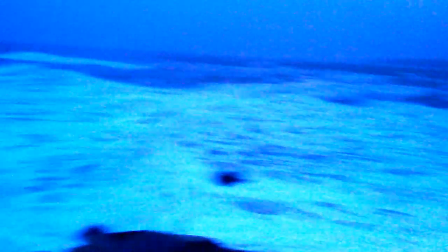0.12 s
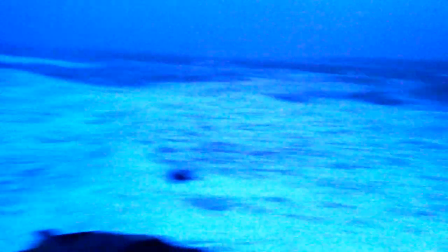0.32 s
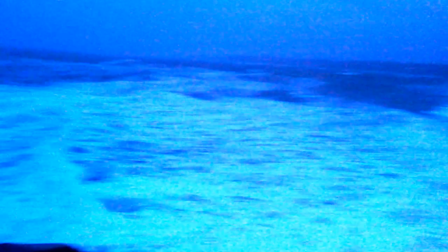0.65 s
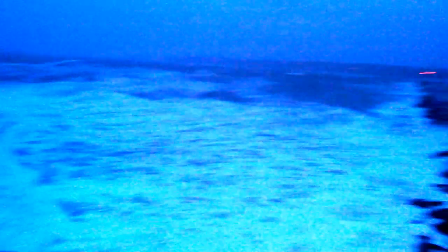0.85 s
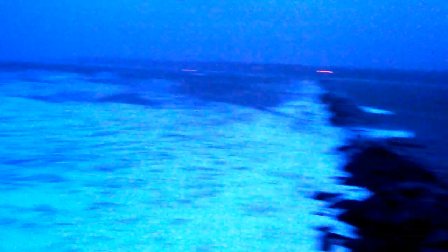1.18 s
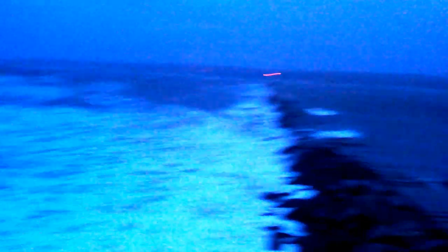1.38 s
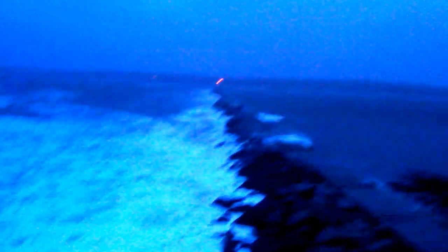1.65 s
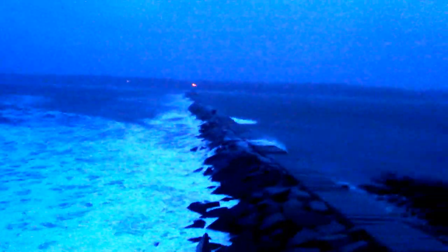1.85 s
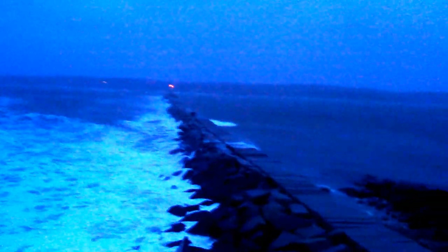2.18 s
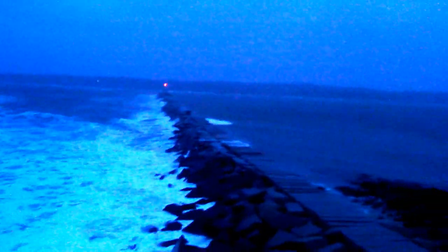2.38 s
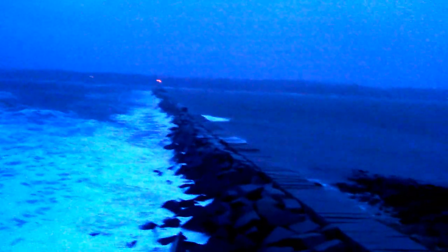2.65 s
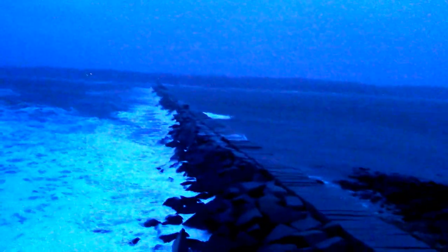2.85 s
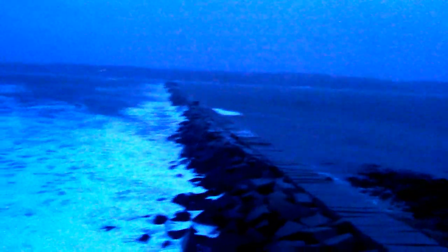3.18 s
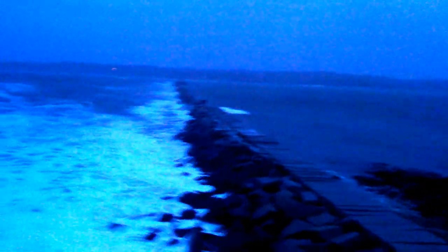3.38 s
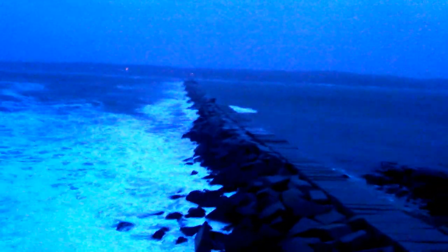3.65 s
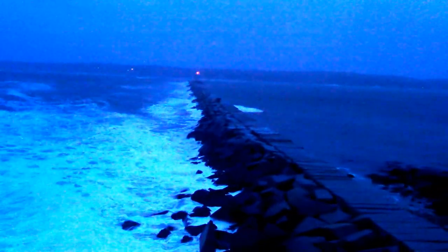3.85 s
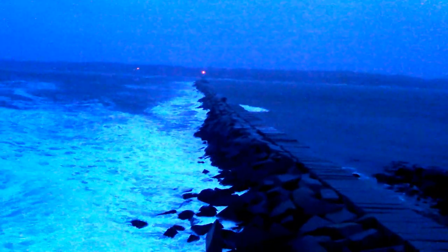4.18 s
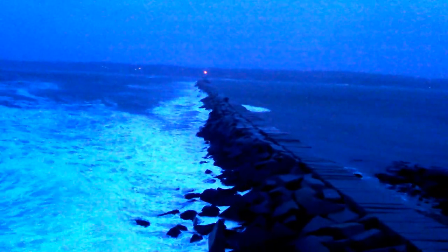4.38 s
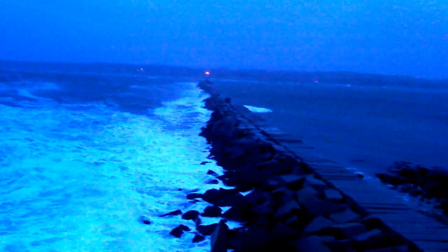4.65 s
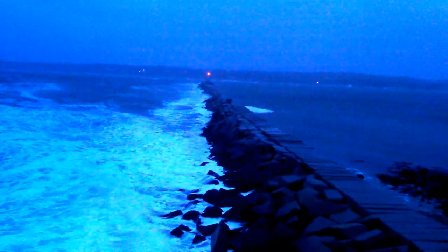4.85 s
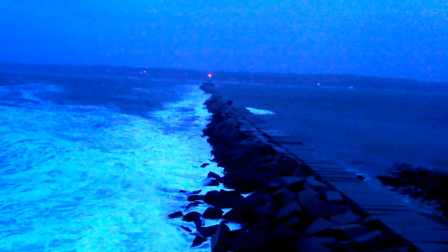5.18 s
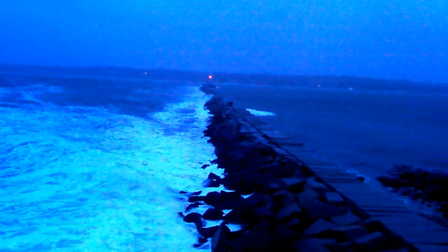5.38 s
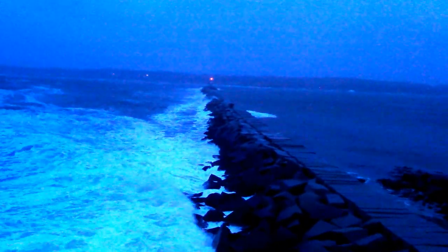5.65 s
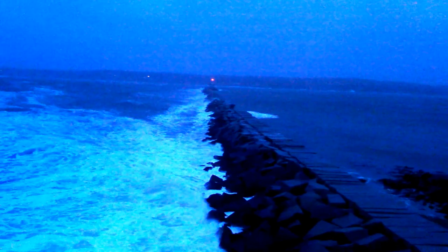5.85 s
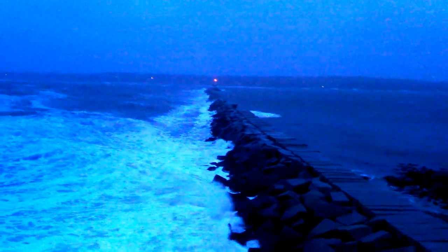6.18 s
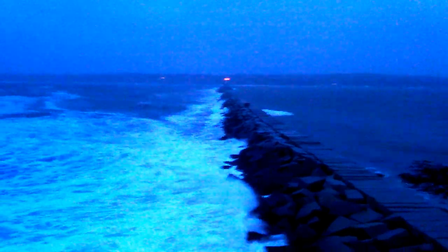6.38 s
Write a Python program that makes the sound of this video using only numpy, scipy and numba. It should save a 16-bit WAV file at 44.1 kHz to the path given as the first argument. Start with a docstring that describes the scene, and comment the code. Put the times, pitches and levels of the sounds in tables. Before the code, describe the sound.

Storm surf roars continuously over breakwater rocks while hard wind gusts thump and rasp on the microphone, easing after about three seconds.

```python
"""Storm surf washes over the rocks of a breakwater while gusts buffet a hand-held camera.
The surf is a broad, churning roar: shaped noise whose patches of foam flare up and die.
The wind is noise that rumbles and rasps in buffets on two microphone ports, with pops on single ports;
a thin sine whistle comes from the electronics. The camera cross-feeds the ports to widen all but the
whistle, and its gain control ducks the whole sound when it gets loud, then slowly lets it back up."""
import sys
import numpy as np
from scipy import signal
from scipy.fft import rfft, irfft
from scipy.io import wavfile
from scipy.ndimage import uniform_filter1d
from numba import njit

SR = 44100
rng = np.random.default_rng(int(sys.argv[2]) if len(sys.argv) > 2 else 0)


def generate_wav(signal):
    """Clip the signal to [-1, 1] and save it as 16-bit WAV at the path in sys.argv[1]."""
    frames = np.transpose(np.atleast_2d(signal))
    scaled = np.clip(frames, -1, 1) * 32767
    pcm = np.round(scaled).astype(np.int16)
    wavfile.write(sys.argv[1], SR, pcm)


N = 287091
T = np.arange(N) / SR  # time in s

# Slow heave of the sea, ahead of the gain control: time_s [s], level_db [dB]
SURF_HEAVE = [(0, -23.5), (0.6, -22.5), (1.3, -21.5), (1.7, -23), (2.2, -21.5), (2.7, -21.5), (3.25, -21),
              (3.7, -25.5), (4.02, -22.5), (4.4, -22), (5.15, -23.5), (5.55, -23), (6, -23.5), (6.51, -21)]
# Relative spectrum of breaking water at one port: frequency_hz [Hz], density_db [dB per Hz]
SURF_SPECTRUM = [(20, -40), (45, -5), (70, 6.5), (130, -2.5), (200, -6.5), (320, -5.5), (450, -9),
                 (700, -16.5), (1000, -19.5), (1500, -25), (2600, -29), (3300, -32), (4700, -33),
                 (6200, -37), (8000, -36.5), (10300, -39), (12300, -45.5), (14000, -41.5)]
# Correlation of the ports, high for long waves: frequency_hz [Hz], likeness [-1 to 1]
SURF_LIKENESS = [(100, 0.99), (300, 0.87), (450, 0.78), (700, 0.53), (1100, 0.084), (14000, 0.031)]


def surf(patchy_db=1.0, churn_db=0.41):
    """Incoherent sum of countless bubbles: noise modulated in time and frequency by patches of foam."""
    roar = ports(SURF_SPECTRUM, SURF_LIKENESS, lean_db=-1.5, lag_ms=0.072)
    hz, frame_s, cells = signal.stft(roar, SR, nperseg=512, noverlap=384)
    patches = rng.standard_normal((len(frame_s), len(hz)))
    patches = uniform_filter1d(patches, size=24, axis=0)  # each patch lasts several frames
    patches = uniform_filter1d(patches, size=7, axis=1)  # and spans several bands
    patches = evened(patches).T
    churn = wander(frame_s, 2.8, 18)
    cells = cells * amp(patchy_db * patches + churn_db * churn)
    foam = signal.istft(cells, SR, nperseg=512, noverlap=384)[1][:, :N]
    level_db, = curves(SURF_HEAVE, T)
    return amp(level_db) * evened(foam)


# Steady push of the wind, hard at first, then a lull, then freshening: time_s [s], rumble_db [dB]
WIND_PUSH = [(0, -13), (0.22, -13), (0.46, -6.5), (0.61, -13.5), (0.8, -10.5), (1.05, -13.5), (1.2, -11.5),
             (1.35, -16.5), (1.55, -3), (1.63, -9.5), (1.95, -9.5), (2.3, -4), (2.58, -14), (2.8, -15.5),
             (3.05, -20.5), (3.62, -14.5), (3.85, -32), (4.25, -22), (4.62, -25.5), (4.85, -15.5),
             (5.02, -18), (5.15, -17), (5.32, -22.5), (5.45, -21), (5.72, -12.5), (6.15, -17),
             (6.51, -13.5)]
# Big eddies that hit the ports: centre_s [s], rumble_db [dB], rasp_db [dB], half_length_s [s]
BUFFETS = [(0.012, -5, -30, 0.014), (0.083, -6, -28, 0.011), (0.134, -4.5, -19, 0.01),
           (0.161, -5, -14.5, 0.011), (0.256, -0.5, -13, 0.0074), (0.28, -4, -12, 0.011),
           (0.308, -8.5, -8.5, 0.012), (0.377, 1, -25, 0.011), (0.4, -2, -30, 0.011),
           (0.427, -3.5, -8, 0.009), (0.464, -2.5, -13, 0.0054), (0.488, 0.5, -12, 0.0088),
           (0.535, -5, -11, 0.013), (0.744, -2, -26, 0.013), (0.778, -0.5, -26, 0.0087),
           (0.874, -4.5, -17.5, 0.014), (1.108, -14, -20, 0.012), (1.195, -12, -17, 0.009),
           (1.238, -14, -26.5, 0.011), (1.282, -6.5, -27, 0.014), (1.42, -2, -8, 0.016),
           (1.462, 2.5, -2, 0.015), (1.505, 6, 3, 0.015), (1.536, -4, -7.5, 0.0083),
           (1.567, -0.5, -14, 0.02), (1.679, -1, -1.5, 0.0052), (1.749, -4, -12, 0.0082),
           (1.863, -1.5, -24, 0.0079), (2.032, 2.5, -1.5, 0.01), (2.052, 1, -6.5, 0.01),
           (2.156, 1, -6, 0.0081), (2.174, -1, -5, 0.0053), (2.246, -4, -10, 0.0073),
           (2.288, 6.5, -2, 0.0096), (2.422, -5, -12.5, 0.019), (2.506, -7, -7, 0.0099),
           (2.682, -7, -12, 0.021), (3.32, -5, -32, 0.015), (3.469, -3.5, -14, 0.011),
           (3.572, -16, -14, 0.016), (3.608, -4.5, -14, 0.0056), (3.631, -9, -22, 0.018),
           (4.166, -7.5, -25, 0.009), (4.203, -10.5, -24, 0.011), (4.293, -17, -18, 0.012),
           (4.469, -8.5, -28, 0.024), (4.707, -10, -17.5, 0.018), (4.768, -10.5, -38, 0.031),
           (4.813, -10, -26, 0.012), (4.88, -11, -42, 0.0062), (4.91, -6, -19, 0.0033),
           (4.964, -6, -25, 0.014), (5.502, -10, -17, 0.011), (5.638, -6.5, -17, 0.022),
           (5.832, -9, -26, 0.0082), (5.863, -8.5, -8, 0.0096), (6.031, -16, -37.5, 0.018),
           (6.327, -12, -23, 0.015), (6.47, -13, -17, 0.0077), (6.5, -10, -21, 0.012)]
# Relative spectrum of the large eddies: frequency_hz [Hz], density_db [dB per Hz]
RUMBLE_SPECTRUM = [(15, -50), (30, -22), (45, -7.5), (65, 3.5), (100, 2), (150, -4), (220, -8),
                   (290, -15.5), (450, -44), (900, -98)]
# Negative where an eddy pushes one port and sucks the other: frequency_hz [Hz], likeness [-1 to 1]
RUMBLE_LIKENESS = [(60, -0.37), (300, -0.25)]
# Relative spectrum of the small eddies: frequency_hz [Hz], density_db [dB per Hz]
RASP_SPECTRUM = [(20, -45), (60, -21), (120, 3.5), (220, -2), (320, 3.5), (500, -8.5), (750, -23),
                 (1100, -30.5), (1700, -40), (4000, -52), (12000, -79)]


def wind(rasp_db=-11.5):
    """Turbulent pressure: large eddies rumble, small ones rasp as the large pressure swings furthest."""
    push_db, = curves(WIND_PUSH, T)
    push = amp(push_db)
    rumble_power = push ** 2
    rasp_power = (push * amp(rasp_db)) ** 2  # rasp_db is relative to the steady rumble
    for centre_s, eddy_rumble_db, eddy_rasp_db, half_length_s in BUFFETS:
        # flat-topped: an eddy arrives and leaves abruptly
        distance = np.minimum(((T - centre_s) / half_length_s) ** 2, 6)
        eddy = np.exp(-distance ** 2)
        rumble_power = rumble_power + amp(eddy_rumble_db) ** 2 * eddy
        rasp_power = rasp_power + amp(eddy_rasp_db) ** 2 * eddy
    rumble = ports(RUMBLE_SPECTRUM, RUMBLE_LIKENESS, lean_db=5.0)
    rumble = rumble / np.sqrt(power(rumble, size=600))
    # the flow tears away at either extreme of the left channel's rumble
    tearing = 1 + rumble[0] ** 2
    rasp = ports(RASP_SPECTRUM, None, lean_db=0.0) * tearing
    rasp = rasp / np.sqrt(power(rasp, size=500))
    return np.sqrt(rumble_power) * rumble + np.sqrt(rasp_power) * rasp


# Small hard eddies that slam one port, peak taken before the opening's filter:
# start_s [s], peak_db [dB], pulse_s [s], port [0 left, 1 right]
POPS = [(0.1921, 12.5, 0.0021, 0), (0.2523, -3, 0.0022, 1), (0.275, 0, 0.00057, 1), (0.368, -3, 0.0035, 0),
        (0.493, 0.5, 0.0018, 1), (1.3978, 4, 0.00053, 0), (1.466, 10, 0.0011, 0), (1.4987, 13, 0.0013, 0),
        (1.566, 0, 0.00032, 1), (1.6773, 6, 0.0013, 0), (2.0221, 5, 0.002, 0), (2.152, 3, 0.00089, 0),
        (2.28, 3, 0.0015, 1), (2.508, 4.5, 0.0015, 0), (2.686, -1, 0.00041, 1), (4.9596, -1.5, 0.0018, 1),
        (5.8592, 3, 0.00063, 1)]


def pops(low_hz=85, top_hz=1400):
    """Impulsive pressure: a steep push and a slower suck on one port, band-limited by its opening."""
    pair = np.zeros((2, N))
    for start_s, peak_db, pulse_s, port in POPS:
        u = np.clip((T - start_s) / pulse_s, 0, 60)
        pulse = u * (2 - u) * np.exp(-u)
        pair[int(port > .5)] += amp(peak_db) * pulse / pulse.max()
    b, a = signal.butter(2, [low_hz, top_hz], "bandpass", fs=SR)
    return widen(signal.lfilter(b, a, pair))


def whine(tone_hz=14208, rms_db=-54.0):
    """Pure tone: a thin steady whistle from the camera's electronics, out of phase between channels."""
    phase_rad = np.array([[2.27], [0]])
    return amp(rms_db) * np.sqrt(2) * np.sin(2 * np.pi * tone_hz * T + phase_rad)


def ports(spectrum, likeness, lean_db, lag_ms=0):
    """Partly coherent noise at two ports, left louder by lean_db and right later by lag_ms, then widened."""
    hz = np.fft.rfftfreq(N, 1 / SR)
    a, b = rfft(rng.standard_normal((2, N)))
    same = np.clip(read(likeness, hz), -1, 1) if likeness else 0
    late = np.exp(-2j * np.pi * hz * lag_ms / 1000)
    left = a * amp(lean_db)
    right = late * (same * a + np.sqrt(1 - same ** 2) * b)
    shaped = np.array([left, right]) * amp(read(spectrum, hz))
    return evened(widen(irfft(shaped, N)))


# Off-centre middle of the stereo picture: frequency_hz [Hz], right_minus_left_db [dB]
MIDDLE_LEAN = [(200, 0), (550, -1), (1400, 1), (2300, 1.5), (12000, 1.5)]


def widen(pair, cross_s=16 / 44100, feedback=0.22):
    """Differential cross-feed: port minus the delayed other, with feedback; antiphase bass, comb notches."""
    hz = np.fft.rfftfreq(N, 1 / SR)
    delay = np.exp(-2j * np.pi * hz * cross_s)
    left, right = rfft(pair) / 2
    mid = (left + right) * (1 - delay) / (1 - feedback * delay)
    side = (left - right) * (1 + delay) / (1 + feedback * delay)
    lean = amp(read(MIDDLE_LEAN, hz) / 2)
    return irfft(np.array([mid / lean + side, mid * lean - side]), N)


@njit
def follow(wanted, attack_share, recovery_step):
    """Envelope following: climbs by a share of the gap per sample, sinks back by a fixed step."""
    out, level = np.zeros(len(wanted)), 0.0
    for i in range(len(wanted)):
        if wanted[i] > level:
            level = level + attack_share * (wanted[i] - level)
        else:
            level = max(level - recovery_step, 0.0)
        out[i] = level
    return out


def amp(db):
    """Logarithmic level: decibels to amplitude gain."""
    return 10 ** (np.asarray(db) / 20)


def read(points, hz):
    """Spectral interpolation: a table joined on a log-frequency axis."""
    f, value = np.transpose(points)
    return np.interp(np.log(hz + 1), np.log(f), value)


def curves(rows, t):
    """Linear interpolation: the columns of a time table at the times t."""
    s, *columns = np.transpose(rows)
    return [np.interp(t, s, c) for c in columns]


def evened(x):
    """Power normalisation: scaled to rms 1."""
    return x / np.sqrt(np.mean(x ** 2) + 1e-20)


def power(x, size):
    """Short-time power: mean of both channels, smoothed twice over size samples."""
    smooth = uniform_filter1d((x ** 2).mean(0), size)
    return abs(uniform_filter1d(smooth, size)) + 1e-14


def wander(t, slow_hz, fast_hz):
    """Random modulation of rms 1: sines of chance phase, the slower ones stronger."""
    total = 0
    for f in np.geomspace(slow_hz, fast_hz, 24):
        total = total + np.sin(2 * np.pi * (f * t + rng.random())) / np.sqrt(f)
    return evened(total)


def scene():
    """Superposition of sea, wind, pops and whine; all but the sea are a little louder on the right."""
    right_lean = amp([[-.8], [.8]])
    return surf() + (wind() + pops() + whine()) * right_lean


def record(dry):
    """Dynamic compression with slow recovery, soft saturation at full scale, then a band limit."""
    threshold_db, squeeze = -13.5, 0.9  # squeeze: dB taken off per dB above the threshold
    attack_s, recovery_db_per_s = 0.018, 9.0
    edge_hz = 14400
    over_db = np.maximum(10 * np.log10(power(dry, size=600)) - threshold_db, 0)
    reduction_db = follow(squeeze * over_db, 1 / (attack_s * SR), recovery_db_per_s / SR)
    ducked = dry / amp(reduction_db)
    rounded = ducked / (1 + ducked ** 8) ** (1 / 8)
    low_pass = signal.firwin(511, edge_hz, window=("kaiser", 9), fs=SR)
    return signal.oaconvolve(rounded, low_pass[None], "same", axes=1)


dry = scene()
out = record(dry)
generate_wav(out)
```